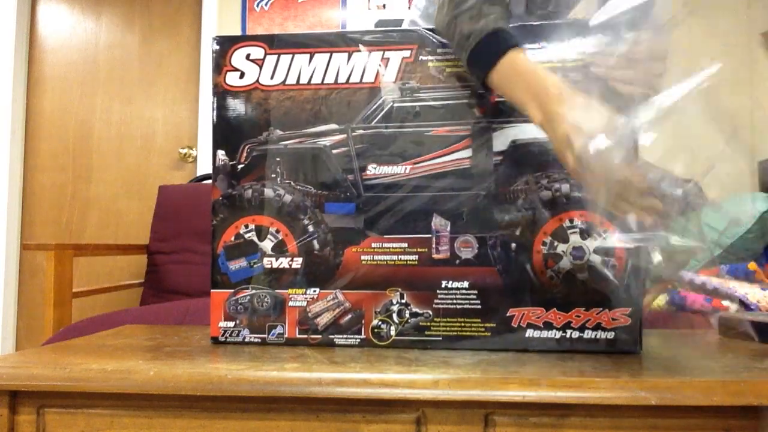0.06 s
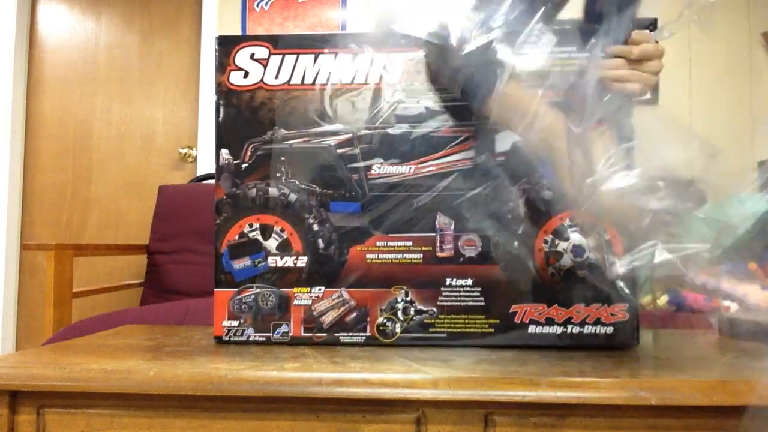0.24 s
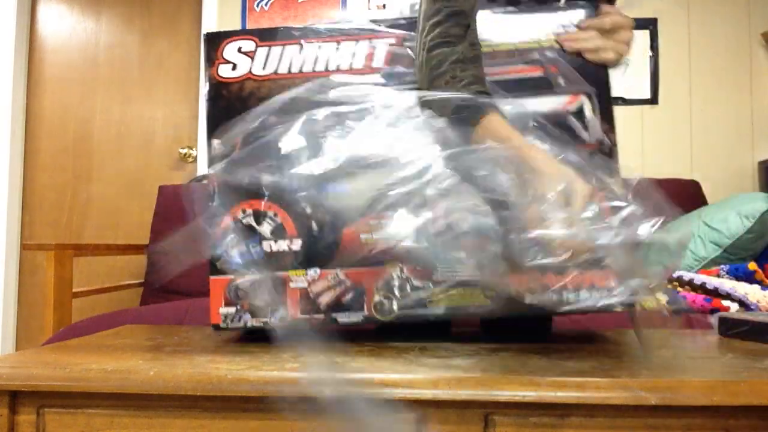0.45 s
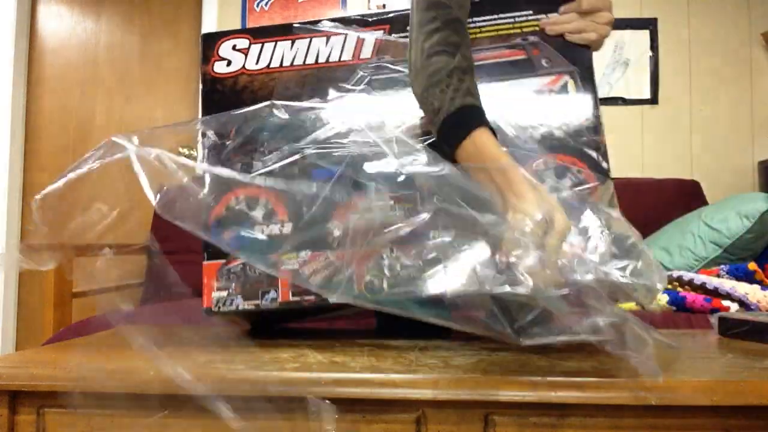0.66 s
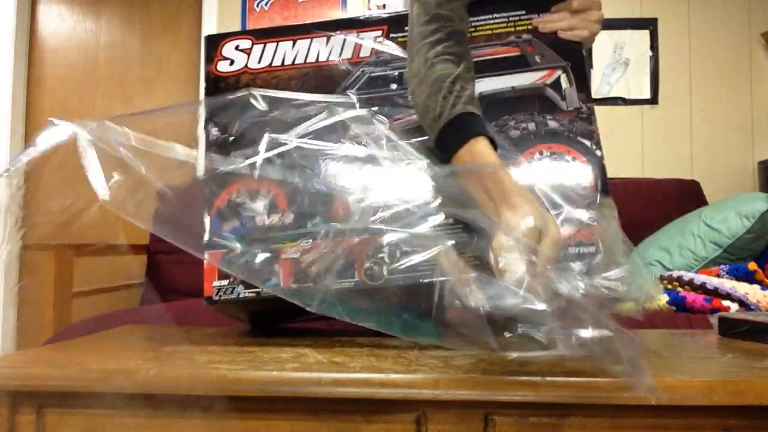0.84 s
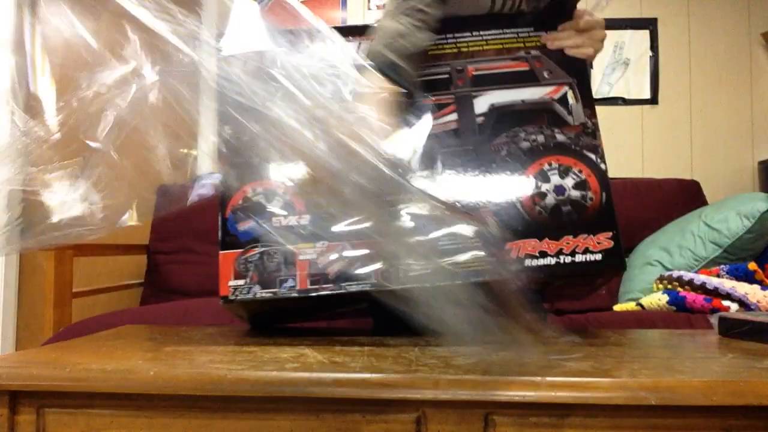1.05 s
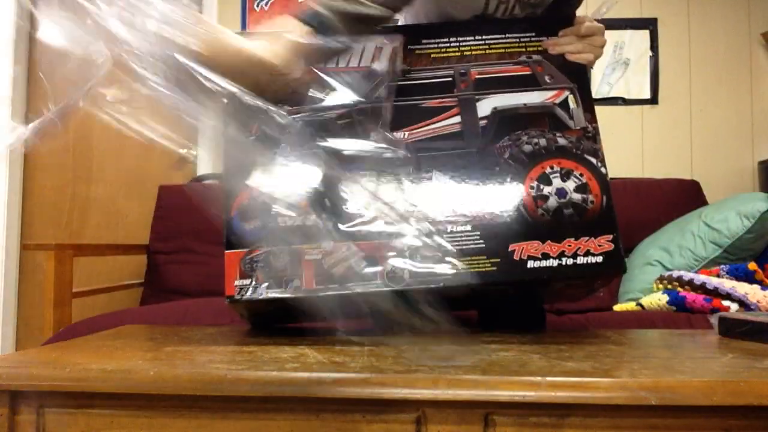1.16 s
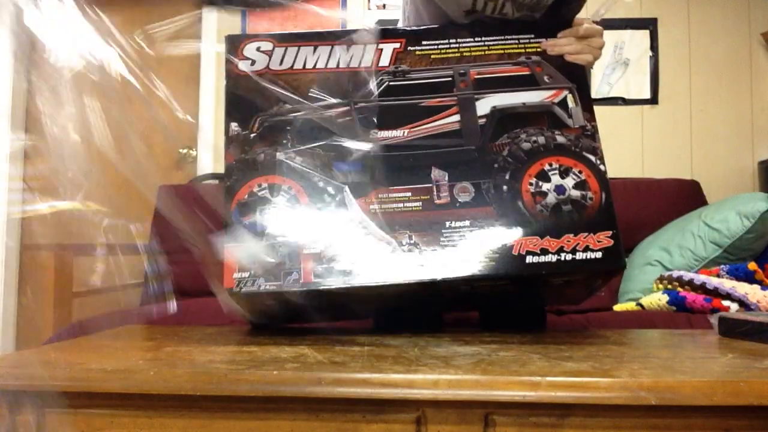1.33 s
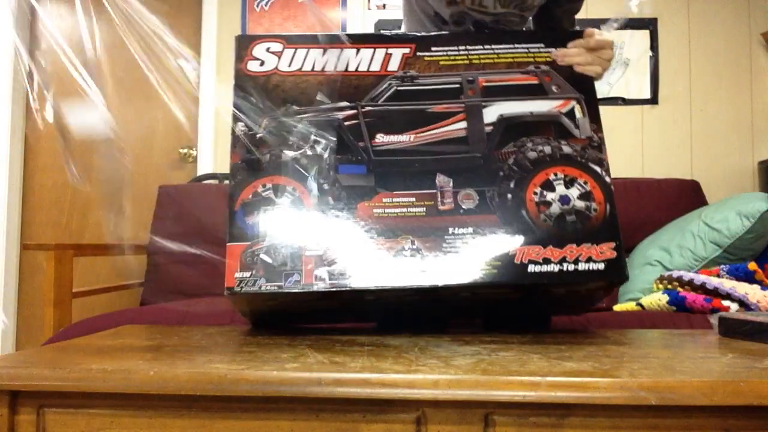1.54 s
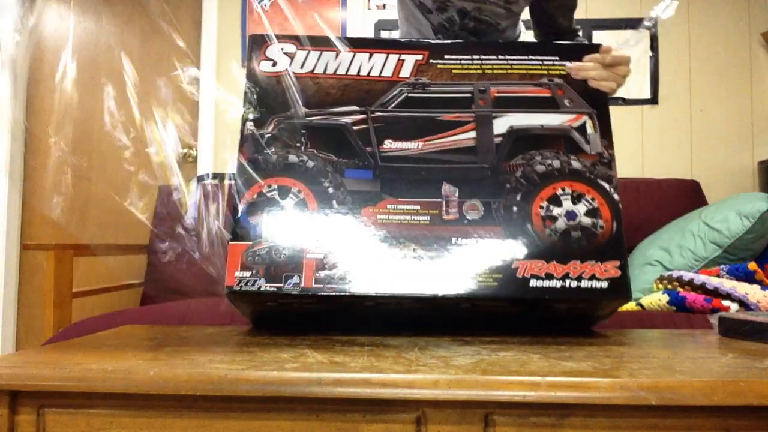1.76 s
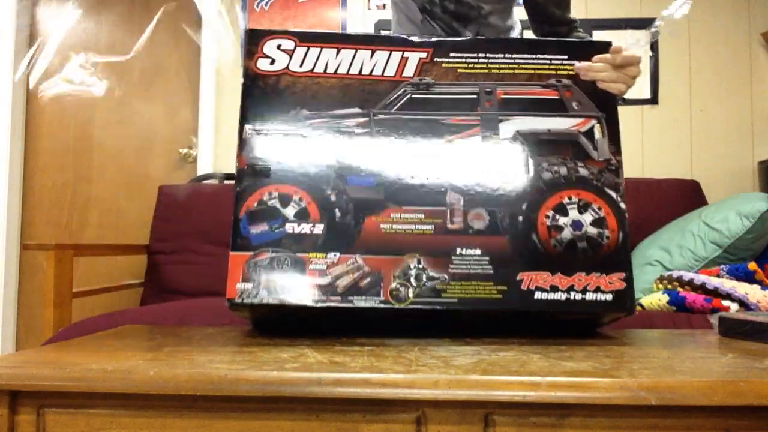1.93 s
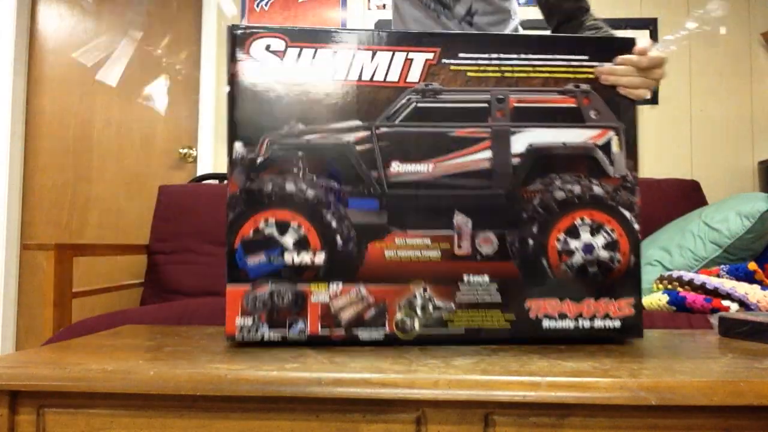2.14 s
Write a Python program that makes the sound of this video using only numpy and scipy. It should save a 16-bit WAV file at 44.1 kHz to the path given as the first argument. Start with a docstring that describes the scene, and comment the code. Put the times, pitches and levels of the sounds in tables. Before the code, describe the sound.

Clear plastic wrap crinkles and snaps loudly as it is pulled off a box and bunched up

```python
"""In a small room, a big sheet of clear plastic wrap is pulled off a cardboard box and bunched up.
Creases buckle in a dense crackle of tiny filtered-noise cracks that follows the pull.
Single folds snap out of it as sharp noise bursts, and small taut facets pop with a short hollow note.
The loose sheet flutters in soft low ticks and flaps in dull puffs; the walls add a short tail."""
import sys
import numpy as np
from scipy import signal
from scipy.fft import rfft, irfft
from scipy.io import wavfile

SR = 44100
rng = np.random.default_rng(int(sys.argv[2]) if len(sys.argv) > 2 else 0)


def materialize(psi):
    """Save the field psi as 16-bit PCM at rate SR to the path in sys.argv[1].

    A 1-D psi becomes a single channel; in a 2-D psi each row is a channel.
    """
    bounded = np.clip(np.atleast_2d(psi).T, -1, 1)
    quanta = np.round(bounded * 32767).astype(np.int16)
    wavfile.write(sys.argv[1], SR, quanta)


N = 97020  # samples, 2.2 s
TIME = np.arange(N) / SR
HZ = np.fft.rfftfreq(4096, 1 / SR)  # frequencies at which filter curves are drawn
SOUND_HZ = np.fft.rfftfreq(N, 1 / SR)  # frequencies in the spectrum of the whole sound
CUTOFF_HZ, LOW_CUT_HZ = 15300, 58
TREBLE_HZ = 6270  # the treble of crackle and snaps starts here
CEILING = 0.75  # peaks are rounded off to stay below this


def amp(db):
    """Turns decibels into gain."""
    return 10 ** (np.asarray(db) / 20)


def unit(x):
    """Scales to an rms of 1."""
    return x / np.sqrt(np.mean(x ** 2) + 1e-20)


def read(points, hz):
    """Reads a table between its points, on a log-frequency axis."""
    f, value = np.transpose(points)
    return np.interp(np.log(hz + 1), np.log(f + 1), value)


def follow(curve):
    """Draws straight lines through the points of a (time, value) table."""
    s, value = np.transpose(curve)
    return np.interp(TIME, s, value)


def add(mix, s, sound):
    """Mixes a sound in at s seconds."""
    part = mix[max(0, round(s * SR)):][:len(sound)]
    part += sound[:len(part)]


def colour(x, db):
    """Filters with the given gain at each of HZ, with no sound ahead of its cause (minimum phase)."""
    log_gain = np.log(amp(np.maximum(db, -100)))
    circle = np.r_[log_gain, log_gain[-2:0:-1]]
    response = np.exp(np.conj(signal.hilbert(circle)))
    taps = np.fft.ifft(response).real[:2048]
    return signal.oaconvolve(x, taps)[:len(x)]


def even_power(db):
    """Shifts a filter curve so that it keeps the power of white noise."""
    return db - 10 * np.log10(np.mean(amp(db) ** 2))


def above(hz, edge_hz, order=4):
    """Soft step from 0 below the edge to 1 above it."""
    return 1 - 1 / (1 + (hz / edge_hz) ** order)


# How long the room rings until it is 60 dB down: (f/Hz, time/s)
ROOM_RING = [(150, 0.43), (700, 0.33), (2000, 0.44), (5000, 0.25), (14000, 0.26)]
ROOM_DB, ROOM_GAP_S = -8.5, 0.0039  # level of the tail, silence before its first reflection
SCATTER_S, SCATTER_LOW_HZ = 0.003, 150  # time between path changes, low cut of the tail


def tail(size=24000):
    """Sparse reflections thicken into a tail, each frequency dying away at its own rate."""
    t = np.arange(size) / SR
    arrives = (rng.random(size) < 0.05 + 2 * t) * (t > ROOM_GAP_S)
    taps = rng.choice([-1., 1.], size) * arrives
    hz, when, z = signal.stft(taps, SR, nperseg=256)
    fade = amp(-60 * when / read(ROOM_RING, hz)[:, None])
    ring = signal.istft(z * fade, SR)[1]
    return ring / np.linalg.norm(ring)


def room(x, count=8):
    """Each instant of the rustle leaves by other paths, so the reflections blur into a plain wash."""
    # overlapping slices of the sound take turns through the different tails
    places = (TIME / SCATTER_S + np.arange(count)[:, None]) % count
    shares = np.sin(np.pi / 2 * np.minimum(places, 2))
    wash = sum(signal.fftconvolve(x * share, tail())[:N] for share in shares)
    return irfft(rfft(wash) * above(SOUND_HZ, SCATTER_LOW_HZ), N)


def clicks(per_s, spread_db):
    """Random impulses, mostly small and a few large."""
    size = np.minimum(rng.exponential(1, N), 3.5)
    happens = rng.random(N) < per_s / SR
    return amp(spread_db * size) * rng.choice([-1, 1], N) * happens


# Movement of the loose sheet, before FLUTTER_DB is added: (t/s, level/dB)
FLUTTER_LEVEL = [(0.0, -45), (0.07, -54), (0.09, -44.5), (0.64, -39), (0.67, -43.5), (0.8, -40.5),
                 (0.83, -30), (1.08, -38.5), (1.11, -38), (1.14, -40.5), (1.43, -51), (1.51, -43),
                 (1.59, -50.5), (1.69, -44), (1.82, -40.5), (1.83, -32.5), (1.98, -64), (2.2, -59.5)]
# Tone of the flutter: (f/Hz, level/dB)
FLUTTER_TONE = [(85, -26), (130, -9.5), (170, -4.5), (260, 5.5), (330, 2.5), (700, 4), (1200, -1),
                (2500, -21.5)]
RIPPLES_PER_S, RIPPLE_SPREAD_DB, FLUTTER_DB = 700, 3.5, -7


def flutter():
    """Ripples of the loose sheet push the air in soft, low ticks."""
    ticks = clicks(RIPPLES_PER_S, RIPPLE_SPREAD_DB)
    ripples = unit(colour(ticks, read(FLUTTER_TONE, HZ)))
    return ripples * amp(FLUTTER_DB + follow(FLUTTER_LEVEL))


# The whole sheet flapping taut: (t/s, peak level/dB, pitch f/Hz)
FLAP_EVENTS = [(.087, -45, 200), (.836, -34.5, 250), (.869, -30.5, 275), (.926, -33, 260),
               (.978, -39.5, 300), (1.108, -22, 490), (1.75, -38, 213), (1.772, -32.5, 444),
               (1.831, -19, 586)]
FLAP_DECAY_S, FLAP_SHAKE_DB = 0.018, -29  # the shaking after the first jerk
FLAP_OCTAVES = 0.61  # from the pitch to where the puff is 3 dB down


def flap(level_db, hz, size=4096):
    """A large panel of film jerks taut with a dull puff and shakes briefly."""
    t = np.arange(size) / SR
    shake = amp(FLAP_SHAKE_DB) * rng.standard_normal(size) * np.exp(-t / FLAP_DECAY_S)
    push = (t == 0) + shake
    octaves_off = np.log2((HZ + 1) / hz)
    puff = colour(push, -10 * np.log10(1 + (octaves_off / FLAP_OCTAVES) ** 6))
    return amp(level_db) * puff / np.max(abs(puff))


# Small taut facets popping with a hollow note: (t/s, level/dB, pitch f/Hz, ring/cycles)
PING_EVENTS = [(.089, -29.5, 1030, 2.3), (.106, -25.5, 2340, 11), (.219, -17.5, 1530, 1.8),
               (.245, -22, 1840, 2.1), (.3775, -19, 1950, 4.4), (.421, -24, 2000, 3.7),
               (.728, -21.5, 2020, 5), (.9525, -11, 3950, 7.3), (1.4786, -14.5, 2100, 2.5),
               (1.831, -10, 2410, 4.9), (1.996, -21.5, 2536, 7.7)]
PING_RISE_S = 0.00018


def ping(level_db, hz, cycles, size=1200):
    """A taut facet pops and rings for a few cycles; its speed is what is heard."""
    t = np.arange(size) / SR
    envelope = (1 - np.exp(-t / PING_RISE_S)) * np.exp(-t * hz / cycles)
    bulge = np.sin(2 * np.pi * hz * t) * envelope
    speed = np.gradient(bulge, t) / (2 * np.pi * hz)
    return amp(level_db) * speed


def facet(count=60):
    """Random resonances of one facet of film, with a spread of 1."""
    return np.interp(HZ, np.linspace(0, CUTOFF_HZ, count), unit(rng.random(count) - 0.5))


# Single folds snapping through; SNAP_DB is added to the level, and the low mids and treble
# count relative to the usual values: (t/s, level/dB, low mids level/dB, treble level/dB, ring/s)
SNAP_EVENTS = [(0.0242, -16.5, -46, -19, 0.0059), (0.0746, -18, -30, -17, 0.002),
               (0.0867, -18, -37, -15, 0.0061), (0.1041, -14.5, -24, -14, 0.0035),
               (0.115, -16, -24, -18, 0.004), (0.146, -17.5, -22, -6.5, 0.005),
               (0.1958, -19, -20, -9, 0.0053), (0.2438, -13.5, -27, -22, 0.0023),
               (0.3153, -19.5, -24, -11, 0.0047), (0.376, -8.5, -21.5, -25, 0.003),
               (0.4088, -23, -32, -26, 0.002), (0.4195, -13, -32, -22, 0.0025),
               (0.4615, -12, -23, -18, 0.0049), (0.4906, -15, -23, -11.5, 0.0066),
               (0.555, -16, -17, -17.5, 0.015), (0.6222, -11.5, -17.5, -16, 0.0063),
               (0.6275, -8.5, -26, -18, 0.0074), (0.6765, -13.5, -21, -11, 0.013),
               (0.7253, -8, -33, -12.5, 0.005), (0.7462, -11.5, -20, -6.5, 0.0061),
               (0.7873, -10, -25.5, -9.5, 0.007), (0.8173, -10, -42, -24, 0.0043),
               (0.828, -3, -36, -25, 0.0075), (0.8375, -3.5, -24, -21, 0.0058),
               (0.8525, -1, -43, -17, 0.01), (0.8617, 0.5, -27, -42, 0.0067),
               (0.8715, 4, -64, -26.5, 0.0049), (0.8885, -3, -40, -24, 0.005),
               (0.9165, -8.5, -28, -20, 0.003), (0.9237, -1, -38, -14, 0.0069),
               (0.9341, -1, -39, -18, 0.0031), (0.9512, -4, -29, -11, 0.0033),
               (0.9766, -3, -39, -22, 0.0025), (0.9955, -7, -24, -20, 0.0032),
               (1.0953, -21, -11.5, -11, 0.008), (1.1695, -13, -42, -16, 0.0064),
               (1.1888, -10, -24.5, -10.5, 0.002), (1.194, -18, -26, -8, 0.0015),
               (1.221, -13, -24, -11.5, 0.0054), (1.284, -14, -35, -10, 0.0015),
               (1.3248, -22.5, -15, 0, 0.0056), (1.3938, -17, -25, -16.5, 0.006),
               (1.4776, -12, -24, -7, 0.0057), (1.6076, -15.5, -22, -9, 0.0097),
               (1.6478, -13.5, -42, -11.5, 0.0075), (1.8219, -2, -29, -14.5, 0.0042),
               (1.8302, -3.5, -20, -12.5, 0.0093), (1.8765, -5, -31, -14.5, 0.0013),
               (1.8786, -5, -30, -14.5, 0.0028), (1.995, -18.5, -20.5, -17.5, 0.0048),
               (2.0164, -22, -29, -15, 0.011), (2.0617, -23.5, -19, -3, 0.0073),
               (2.1722, -21, -24, -6, 0.00093)]
# Tone shared by all snaps: (f/Hz, level/dB)
SNAP_TONE = [(40, -62), (200, -34), (700, -10), (1500, -5.5), (2800, 0), (5000, 1.5), (8000, -0.5),
             (12000, -4.5), (15000, -12)]
SNAP_DB, SNAP_PEAKS_DB = -9.5, 3
SNAP_GIVE_S = 0.001  # the fold gives silently for this long
CRACK_DB, SNAP_CRACK_S = -1.5, 0.00023  # peak of the crack, time to reach it
LOW_HZ, USUAL_LOW_DB, USUAL_TREBLE_DB = 1730, -24, -12.5


def snap(level_db, low_db, treble_db, ring_s, size=2400):
    """A fold gives for a moment, pops through with a sharp crack, and the film shivers on."""
    t = np.maximum(np.arange(size) / SR - SNAP_GIVE_S, 0)
    crack = amp(CRACK_DB) * t / SNAP_CRACK_S * np.exp(1 - t / SNAP_CRACK_S)
    shiver = (t > 0) * np.exp(-t / ring_s)
    burst = rng.choice([-1., 1.], size) * (shiver + crack)
    treble = above(HZ, TREBLE_HZ)
    peaks = SNAP_PEAKS_DB * facet() * (1 - treble)
    tone = even_power(read(SNAP_TONE, HZ) + peaks)
    low_tilt = (low_db - USUAL_LOW_DB) * (1 - above(HZ, LOW_HZ))
    treble_tilt = (treble_db - USUAL_TREBLE_DB) * treble
    return amp(SNAP_DB + level_db) * colour(burst, tone + low_tilt + treble_tilt)


CREASE_PEAKS_DB = 3.5
CREASE_RING_S = 0.0019  # typical; each crease has half to double this
CREASE_CRACK_DB, CRACK_S = 0.5, 0.000073  # level and decay of the tiny crack


def crease(size=512, count=16):
    """One crease buckles: a tiny crack with a colour and a ring time of its own."""
    t, hz = np.arange(size) / SR, np.fft.rfftfreq(size, 1 / SR)
    peak_hz = np.linspace(0, SR / 2, count) + rng.uniform(-700, 700)
    peaks = np.interp(hz, peak_hz, rng.standard_normal(count))
    shiver = irfft(rfft(rng.standard_normal(size)) * amp(CREASE_PEAKS_DB * peaks))
    ring_s = CREASE_RING_S * 2 ** rng.uniform(-1, 1)
    crack = amp(CREASE_CRACK_DB) * np.exp(-t / CRACK_S)
    return unit(shiver * (np.exp(-t / ring_s) + crack))


def buckling(creases, per_s, spread_db):
    """Creases give way one after another, at uneven gaps and in uneven sizes."""
    out, at = np.zeros(N), 0
    gaps = rng.gamma(2, 0.5, N)  # 1 on average
    sizes = np.clip(rng.standard_normal(N), -2, 2)
    choices = rng.integers(0, len(creases), N)
    for gap, size, which in zip(gaps, sizes, choices):
        at += gap / per_s
        if at > N / SR:
            break
        add(out, at, amp(spread_db * size) * creases[which])
    return unit(out)


CLUSTERS_PER_S, CLUSTER_DB = 130, 1.7  # rate of new random levels, their spread


def clusters(size=1000):
    """One crease sets off its neighbours: a wandering gain makes small clumps and gaps."""
    levels = unit(rng.random(size) - 0.5)
    return amp(CLUSTER_DB * np.interp(TIME * CLUSTERS_PER_S, np.arange(size), levels))


# How hard the sheet is worked; CRACKLE_DB is added to the level and SHEEN_DB to the treble:
# (t/s, crackle level/dB, treble level/dB)
PULL_STRENGTH = [(0, -35, -8), (0.07, -39, -10), (0.12, -33.5, -4.5), (0.28, -36.5, -8),
                 (0.315, -30.5, -2.5), (0.35, -37.5, -3), (0.4, -31.5, -5.5), (0.45, -28.5, -2.5),
                 (0.48, -32, -3.5), (0.509, -27, -2), (0.54, -38, -2), (0.61, -35, -10), (0.639, -29.5, -1),
                 (0.71, -38.5, -7), (0.78, -39, -10), (0.808, -31, 1), (0.852, -20, -1), (0.9, -27.5, 3),
                 (1.0, -25.5, -1.5), (1.075, -28, 0), (1.11, -25.5, 2.5), (1.15, -34, 1), (1.22, -28.5, -4),
                 (1.3, -31, -5.5), (1.37, -41.5, -15), (1.42, -33, -9), (1.46, -35.5, -3), (1.501, -27, -6),
                 (1.59, -36.5, -8), (1.64, -34, -11), (1.688, -24, -4), (1.74, -31.5, -19),
                 (1.771, -24.5, -11), (1.81, -32.5, -14), (1.85, -27.5, -5), (1.89, -29.5, 3),
                 (1.96, -39.5, -24), (2.1, -44, -2.5), (2.2, -39, -12)]
# Tone of the creases: (f/Hz, level/dB)
CREASE_TONE = [(100, -53), (400, -28.5), (900, -10), (1800, -2.5), (3000, -1), (3600, -2.5), (4400, 2),
               (6500, -2), (9000, -3.5), (12000, -7), (15000, -11.5)]
CRACKLE_DB, SHEEN_DB = 1.5, 4
CREASES_PER_S, CREASE_SPREAD_DB = 2200, 1
CRINKLES_PER_S, CRINKLE_SPREAD_DB, CRINKLE_DB = 190, 0.5, -7


def crackle(count=400):
    """Distinct crinkles over a bed of tiny creases; the pull sets loudness and brightness."""
    creases = [crease() for _ in range(count)]
    bed = buckling(creases, CREASES_PER_S, CREASE_SPREAD_DB)
    crinkles = buckling(creases, CRINKLES_PER_S, CRINKLE_SPREAD_DB)
    both = bed * clusters() + amp(CRINKLE_DB) * crinkles
    rustle = unit(colour(both, read(CREASE_TONE, HZ)))
    treble = irfft(rfft(rustle) * above(SOUND_HZ, TREBLE_HZ), N)
    s, level_db, bright_db = np.transpose(PULL_STRENGTH)
    brightness = amp(np.interp(TIME, s, bright_db) + SHEEN_DB)
    loudness = amp(CRACKLE_DB + np.interp(TIME, s, level_db))
    return loudness * (rustle - treble + treble * brightness)


def scene():
    """Mixes the sounds of the wrap with their reflections."""
    wrap = flutter() + crackle()
    for table, sound in ((FLAP_EVENTS, flap), (PING_EVENTS, ping), (SNAP_EVENTS, snap)):
        for s, *row in table:
            add(wrap, s, sound(*row))
    return (wrap + amp(ROOM_DB) * room(wrap))[None]


def record(dry):
    """Rounds off the sharpest peaks, then cuts the deepest lows and the highest treble."""
    rounded = dry / (1 + (dry / CEILING) ** 4) ** 0.25
    low_cut = signal.butter(2, LOW_CUT_HZ, "highpass", fs=SR, output="sos")
    lean = signal.sosfilt(low_cut, rounded)
    band_limit = signal.firwin(511, CUTOFF_HZ, window=("kaiser", 8), fs=SR)
    return signal.oaconvolve(lean, band_limit[None], "same")


dry = scene()
out = record(dry)
materialize(out)
```